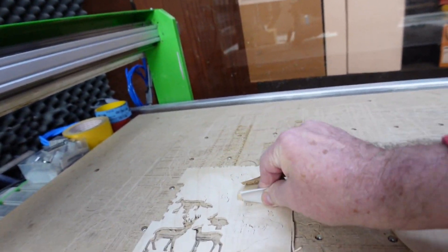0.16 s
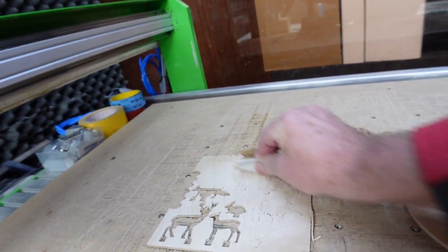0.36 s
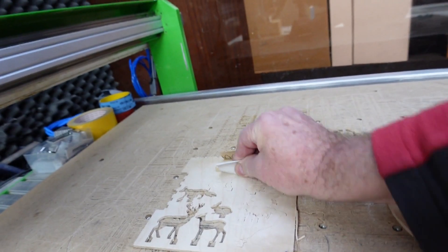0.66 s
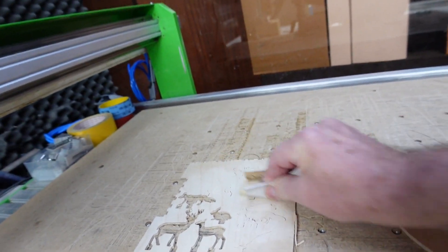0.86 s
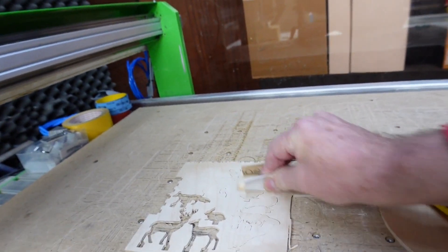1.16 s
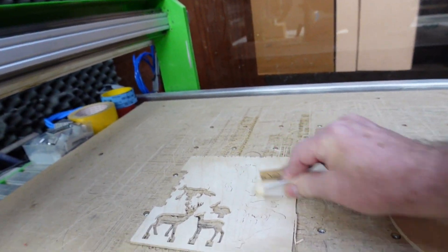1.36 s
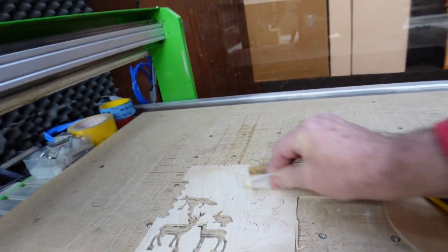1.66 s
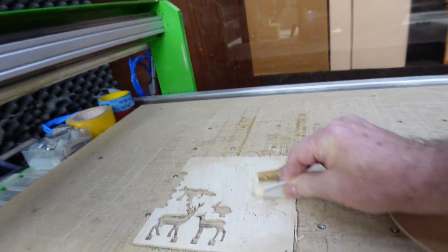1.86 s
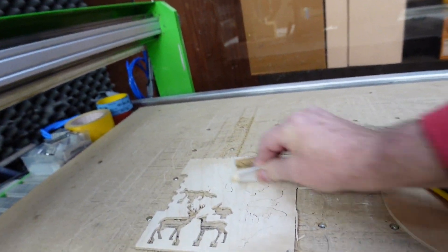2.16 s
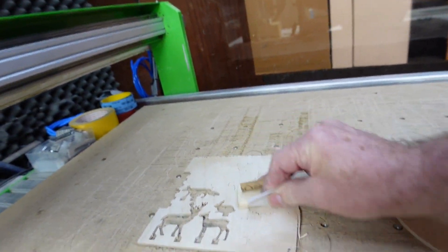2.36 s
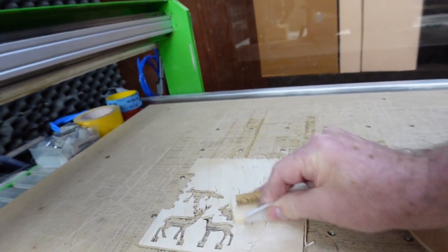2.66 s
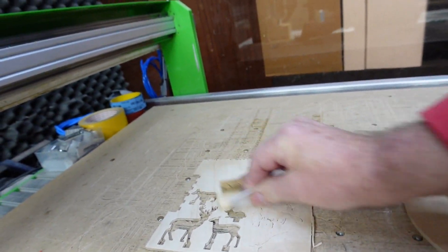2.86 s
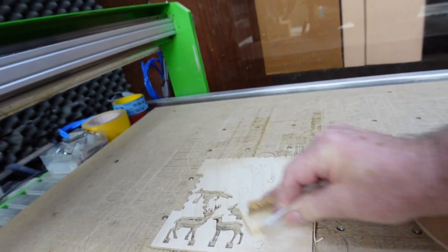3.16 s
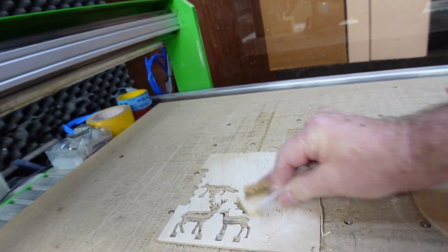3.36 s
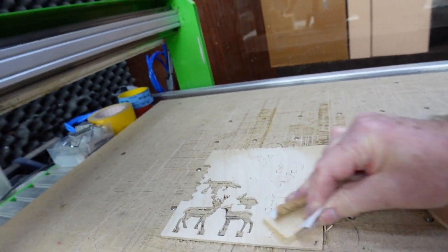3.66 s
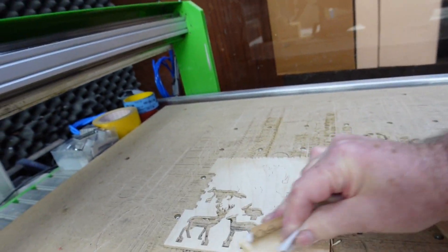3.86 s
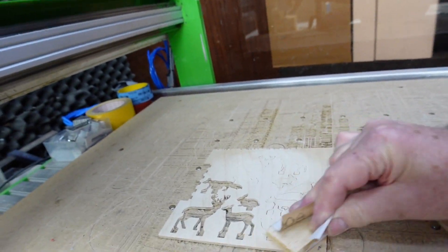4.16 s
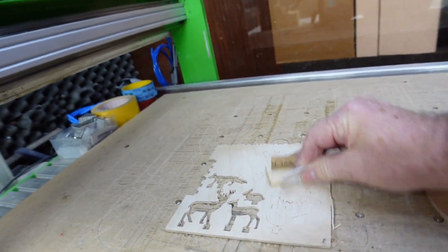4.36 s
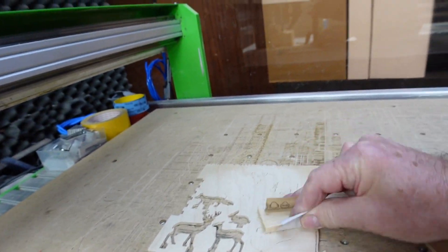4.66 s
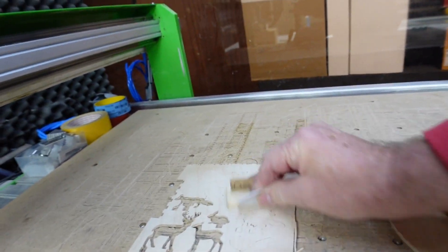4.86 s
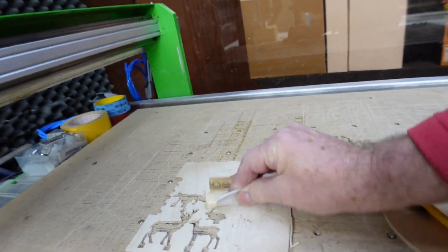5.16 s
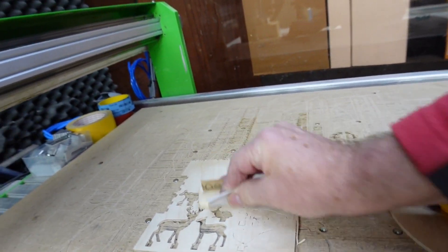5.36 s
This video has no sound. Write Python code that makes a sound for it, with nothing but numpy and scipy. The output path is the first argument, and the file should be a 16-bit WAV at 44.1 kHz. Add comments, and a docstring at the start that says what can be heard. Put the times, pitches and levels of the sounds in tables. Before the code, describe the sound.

In a workshop, heard from very near and almost dry, bristles scratch back and forth over wood in quick, uneven strokes, alternately stronger and weaker, each opening with a small catch. Low table bumps and papery hollow taps lie underneath. Hard clicks stand out around three to four seconds, where the scrubbing briefly fades before returning. Behind it are a steady soft fan hum and a very high, faint whine.

```python
"""Scrubbing brush on cut plywood

A small stiff brush is scrubbed to and fro over cut plywood on a machine table, heard from close by.
Bristle rasp is shaped noise and flicks that follow the speed of each stroke; catches and grazes are noise bursts.
Hard bright ticks, board knocks, table bumps and hollow taps are sums of dying modes.
Behind them lie a faint room tail, a fan drone of resonant noise, a steady-pitched whine and a brief whistle."""
import sys
import numpy as np
from scipy import signal
from scipy.io import wavfile
from scipy.ndimage import uniform_filter1d

SR = 44100
rng = np.random.default_rng(int(sys.argv[2]) if len(sys.argv) > 2 else 0)


def invert_db(level):
    """Linear amplitude ratio for a level in decibels (20 dB per decade), elementwise."""
    return 10 ** (np.asarray(level, dtype=float) / 20)


def digitize_waveform(pressure):
    """Quantize a signal to 16-bit integers and store it at the path in sys.argv[1].

    Rows of a 2-D input are taken as channels; values are limited to [-1, 1].
    """
    field = np.atleast_2d(pressure).T
    bounded = np.clip(field, -1, 1)
    quanta = np.round(bounded * 32767).astype(np.int16)
    wavfile.write(sys.argv[1], SR, quanta)


N = 243431


def evened(x):
    """Scales to rms 1."""
    return x / np.sqrt(np.mean(x ** 2) + 1e-20)


def wobble(count, smooth):
    """Slow random curve of rms 1: white noise averaged over smooth points."""
    return evened(uniform_filter1d(rng.standard_normal(count), smooth))


def read(points, hz):
    """Reads a table on a log-frequency axis, as a column."""
    f, value = np.transpose(points)
    return np.interp(np.log(hz + 1), np.log(f + 1), value)[:, None]


def add(mix, s, sound):
    """Mixes a sound in at time s."""
    part = mix[round(s * SR):][:len(sound)]
    part += sound[:len(part)]


def pair(z, other, hz):
    """Two microphone ports: partly alike spectra, with a balance and a phase lead."""
    # Each row: frequency in Hz, left-right likeness.
    likeness = [(60, 0.92), (180, .995), (550, 0.98), (1200, 0.99), (2200, 1), (6800, 1), (8200, .95),
                (11000, 0.82), (15000, 1)]
    # Each row: frequency in Hz, left minus right in dB.
    balance_db = [(60, -0.5), (1000, -0.5), (2500, -1.1), (6800, 0.5), (8500, -1.5), (15000, -3.5)]
    # Each row: frequency in Hz, lead of the left port in radians.
    lead_rad = [(60, 0.023), (6800, 0.026), (9000, -0.41), (11600, -0.096), (16000, 0.01)]
    same = np.clip(read(likeness, hz), -1, 1)
    turn = invert_db(read(balance_db, hz) / 2) * np.exp(.5j * read(lead_rad, hz))
    near, far = np.sqrt((1 + same) / 2), np.sqrt((1 - same) / 2)
    left = (near * z + far * other) * turn
    right = (near * z - far * other) / turn
    return np.array([left, right])


def ring(modes, rise_s, detune, pitch=1):
    """One blow: dying modes of alternate sign, each a little off from blow to blow, peak 1."""
    t = np.arange(SR // 4) / SR
    sign = (-1) ** np.arange(len(modes))
    factors = pitch * (1 + detune * rng.standard_normal(len(modes))) * sign
    x = np.zeros(len(t))
    for (hz, db, t60_s), factor in zip(modes, factors):
        x += invert_db(db - 60 * t / t60_s) * np.sin(2 * np.pi * hz * factor * t)
    x = x * (1 - np.exp(-t / rise_s))
    return x / abs(x).max()


def bristle_noise(flicks_per_s=3000, flick_db=2.5, flick_share=0.3):
    """Two raw noises: bristle tips slip (white noise) and flick over the grain (random clicks)."""
    flicks = (rng.random((2, N)) < flicks_per_s / SR) * invert_db(flick_db * np.minimum(rng.exponential(1, (2, N)), 4))
    flicks *= rng.choice([-1., 1.], (2, N))
    slips = rng.standard_normal((2, N))
    return evened(slips) + flick_share * evened(flicks)


def brush(patchy_db=1.97, flicker_db=0.29, width_wander_db=3.0):
    """Bristle tips rasp over the grain; hand speed sets level and brightness, catches add bursts."""
    # Strokes to and fro. Each row: catch of the bristles in seconds, crest level in dB before shading,
    # lateness of the crest, roundness of the speed arch, catch peak in dB before its tilt.
    strokes = [(-.005, -36, 1.2, 0.63, -43), (0.0494, -31, 0.97, 1.5, -20), (0.35, -32.5, 1.28, 0.6, -35),
               (0.478, -30.5, 1.4, 0.75, -27), (0.621, -27, 1.26, 0.96, -22),
               (0.7466, -30, 1.22, 0.64, -33), (0.8884, -28.5, 1.04, 0.75, -17),
               (1.0137, -29, 1.6, .52, -27), (1.1627, -27, 0.89, 1.12, -19), (1.278, -31, 1.37, .65, -25),
               (1.4, -29, 1.17, 1.15, -19), (1.5245, -31, 1.27, 0.49, -21), (1.653, -28, 1.08, 1.07, -14.5),
               (1.7884, -33.5, 1.46, 0.53, -20), (1.9126, -27.5, 1.25, 1.14, -24),
               (2.0453, -32.5, 1.03, 0.59, -21), (2.172, -27.5, 1.15, 1.07, -18),
               (2.303, -30.5, 1.2, 0.51, -22), (2.434, -26, 1.2, 1.05, -21), (2.569, -29, 1.4, 0.48, -27),
               (2.716, -27, 0.98, 1.07, -21), (2.8654, -30.5, 1.23, 0.56, -16.5),
               (3.007, -27, 1.13, 1.24, -16), (3.135, -29.5, 1.24, .46, -19), (3.287, -29, 1.1, 1.33, -29),
               (3.4056, -30.5, 1.22, 1, -28), (3.538, -29, 1, 0.97, -31), (3.655, -32.5, 0.99, 0.93, -32),
               (3.7787, -31.5, 0.97, 0.74, -31), (3.903, -33, 1.08, 0.8, -35),
               (4.0394, -35, 0.93, 1.4, -39), (4.153, -38, .91, 0.89, -38), (4.2737, -28, .92, 0.67, -23),
               (4.399, -31.5, 1.5, 0.67, -26), (4.52, -28.5, 0.81, 0.72, -26), (4.63, -32, 1.1, 0.76, -29),
               (4.746, -31, 1, 0.61, -21), (4.8717, -32.5, 0.8, 0.92, -38), (4.9881, -31, 1.07, 1.02, -23),
               (5.126, -33.5, 0.89, 0.72, -16), (5.243, -31.5, 1.12, 1.24, -18.5),
               (5.3596, -32.5, 0.9, 1.13, -38), (5.4733, -29.5, 1.05, 0.65, -27)]
    # Bristles brush the board while the hand pauses. Each row: start in seconds, peak in dB before its tilt.
    grazes = [(.221, -24), (.2804, -41)]
    # A catch is duller than the stroke. Each row: frequency in Hz, gain in dB.
    catch_tilt = [(1000, 12.5), (4000, 0.5), (12000, -22.5)]
    # Loose tips are brighter than a catch. Each row: frequency in Hz, gain in dB.
    graze_tilt = [(1000, 5), (4000, -1), (8000, 4), (15000, 0)]
    # Rasp colour. Each row: frequency in Hz, relative density in dB per Hz.
    rasp = [(350, -41), (620, -29.5), (830, -18), (1000, -17.5), (1380, -9), (1650, -15), (2050, -13.5),
            (3400, -3.5), (4750, -0.5), (5600, -4.5), (7400, -0.5), (9200, -3.5), (12000, -4.5),
            (15000, -9), (16500, -11)]
    # Each row: frequency in Hz, share of the stroke's spread.
    spread_share = [(500, 0.9), (1800, 1), (3500, 0.087), (6000, 0.21), (10000, 0.62), (16000, 0.93)]
    # Each row: frequency in Hz, power of speed in the level.
    speed_power = [(600, 0.37), (3000, 0.86), (9000, 0.99), (16000, 1.17)]
    # Lean of the brush. Each row: time in seconds,
    # dB moved from the middle of the rasp to its treble and, less, its low end.
    lean = [(0, -3.5), (.8, -3), (1.6, -3), (2.4, -1.8), (3.5, -2.5), (4.0, -6.5), (4.4, -1.7), (4.7, -1),
            (5.1, -3), (5.5, -2)]
    # Each row: frequency in Hz, share of the lean.
    lean_share = [(700, 0.3), (1300, 0.24), (2100, -0.5), (3500, -0.35), (10000, 0.98), (16000, 1.17)]
    # Rasp's low end as the brush moves over the board. Each row: time in seconds, gain in dB.
    low_rasp = [(0, 3), (.6, 2), (1.4, 1.5), (2.2, 0), (3.2, 0), (3.8, -2.5), (4.6, -2), (5.5, -1.5)]
    # Each row: frequency in Hz, share of the low-end gain.
    low_share = [(800, 1), (1700, 0)]
    # from the turn of the hand to the catch: a slow start flips late
    flip_s, flip_s_per_roundness = 0.0036, 0.013
    # a stroke lasts to the next turn, or the brush is lifted
    longest_s, overlap, last_stroke_s = 0.1575, 0.96, 0.19
    catch_fade_s, crest_db = 0.0084, -15
    hold_s, hold_db = 0.025, -5
    grip, creep_db = 0.11, -21
    # a light stroke has a wider rasp than one pressed hard
    spread_per_db, plain_db = -0.63, -28.5

    hz, t, z = signal.stft(bristle_noise(), SR, nperseg=256, noverlap=192)
    power, free = np.zeros(z.shape[1:]), np.ones(len(t))
    catch_s, _, _, round_, catch_db = np.transpose(strokes)
    turns = catch_s - flip_s - flip_s_per_roundness * round_
    lengths = np.minimum(overlap * np.diff(turns, append=turns[-1] + last_stroke_s), longest_s)

    bursts = [(s, db + read(catch_tilt, hz)) for s, db in zip(catch_s, catch_db)]
    bursts += [(s, db + read(graze_tilt, hz)) for s, db in grazes]
    for s, db in bursts:
        # the rasp is held down just ahead of a burst
        free[(t < s) & (t > s - hold_s)] = invert_db(hold_db)
        # rms of the burst lies a crest below its peak
        power += (t >= s) * invert_db(db + crest_db) ** 2 * np.exp(-2 * abs(t - s) / catch_fade_s)

    for s, length, (_, db, late, roundness, _) in zip(turns, lengths, strokes):
        spread_db = spread_per_db * (db - plain_db)
        u = np.clip((t - s) / length, 0, 1)
        arch = abs(np.sin(np.pi * u ** late)) ** roundness
        # below a least speed the tips grip and fall silent
        speed = np.maximum(arch - grip, 0) / (1 - grip) * np.where(u < .4, free, 1)
        # the bent bristles still creep around each turn of the hand
        creep = invert_db(creep_db) * np.exp(-((t - s - length / 2) / (0.54 * length)) ** 8)
        level = invert_db(db + spread_db * read(spread_share, hz))
        power += (level * (speed + creep) ** read(speed_power, hz)) ** 2

    grain = rng.standard_normal((len(t), len(hz))).T
    patches = evened(uniform_filter1d(uniform_filter1d(grain, 4, 0), 25, 1))
    flicker = wobble(len(t), 8)
    shade_db = np.interp(t, *np.transpose(lean)) * read(lean_share, hz)
    shade_db = shade_db + np.interp(t, *np.transpose(low_rasp)) * read(low_share, hz)
    # the rasp's stereo width wanders at random
    wander = invert_db(width_wander_db * wobble(len(t), 30))
    colour = evened(invert_db(read(rasp, hz)))
    field = np.sqrt(power) * colour * invert_db(shade_db + patchy_db * patches + flicker_db * flicker)
    ports = pair(z[0] * field, z[1] * field * wander, hz)
    return signal.istft(ports, SR, nperseg=256, noverlap=192)[1][:, :N]


def fan(swell_db=0.47, air_db=-67, other_share=0.44):
    """Air noise through the resonances of a casing, over a faint wide hiss."""
    # Casing resonances. Each row: frequency in Hz, width in Hz, level in dB rms.
    drone = [(381.1, 16, -55.5), (400.6, 17, -56.5), (487.2, 31.5, -62), (344, 17, -68), (278, 22, -74.5),
             (98, 9.2, -87), (87, 12, -84), (212, 41, -73)]
    # Hiss colour. Each row: frequency in Hz, relative density in dB per Hz.
    air = [(30, -26), (100, -17), (300, -14), (600, 0), (1000, -16), (1500, -21), (4000, -22), (7000, -21),
           (11000, -26), (16000, -18)]
    hz, t, z = signal.stft(rng.standard_normal((2, N)), SR, nperseg=8192)
    casing = np.zeros(len(hz))
    for centre_hz, width_hz, db in drone:
        peak = 1 / (1 + ((hz - centre_hz) / width_hz) ** 2) ** 1.19
        casing += (invert_db(db) * evened(peak)) ** 2
    hiss = invert_db(air_db) * evened(invert_db(read(air, hz)))
    field = np.sqrt(casing[:, None] + hiss ** 2)
    swell = invert_db(swell_db * wobble(len(t), 3))
    ports = pair(z[0] * field * swell, other_share * z[1] * field, hz)
    return signal.istft(ports, SR, nperseg=8192)[1][:, :N]


def tones():
    """A high sine whine, steady in pitch, and a whistle, wavering in pitch and level, that shows in the pause."""
    # Each row: time in seconds, whine level in dB rms.
    whine_db = [(0, -66), (.3, -69), (.6, -66), (2, -64), (3.5, -60), (4.2, -68), (5.6, -60)]
    whine_hz = 15321
    whistle_hz, whistle_db, octave_db = 6000, -64.5, -8
    from_s, to_s, fade_s = .14, .36, 0.018
    waver, flutter_db = 0.0029, 2  # rms: share of the pitch, dB
    t = np.arange(N) / SR
    whine = invert_db(np.interp(t, *np.transpose(whine_db))) * np.sin(2 * np.pi * whine_hz * t)
    phase = 2 * np.pi * np.cumsum(whistle_hz * (1 + waver * wobble(N, 400))) / SR
    edges = np.clip(np.minimum(t - from_s, to_s - t) / fade_s, 0, 1)
    level = edges * invert_db(whistle_db + flutter_db * wobble(N, 500))
    whistle = level * (np.sin(phase) + invert_db(octave_db) * np.sin(2 * phase))
    return np.sqrt(2) * (whine + whistle)  # from rms to peak


def room(x, t60_s=0.81, first_s=0.0038):
    """A short diffuse tail of dying noise, different at each port, duller than the source."""
    t = np.arange(SR // 3) / SR
    tail = rng.standard_normal((2, len(t))) * invert_db(-60 * t / t60_s) * (t > first_s)
    tail = signal.lfilter([1], [1, -.6], tail)
    return signal.fftconvolve(x[None], tail / np.linalg.norm(tail[0]), axes=1)[:, :N]


def blows(tick_side_db=-5, knock_side_db=-18, bump_side_db=-22, frame_side_db=-15.5):
    """Ticks, knocks and bumps set modes ringing; each port hears a slightly different ring."""
    # Hard bright ticks. Each row: start in seconds, peak in dB, pitch factor.
    ticks = [(0.3493, -25.5, 0.89), (2.8221, -15, 0.86), (3.1064, -12.5, 0.86), (3.3809, -15, 0.9),
             (3.6337, -11, 0.91), (3.6414, -36, 0.6), (3.9011, -17.5, 0.9), (4.156, -22, 0.88)]
    # Brush head on cut edges. Each row: start in seconds, peak in dB.
    knocks = [(0.914, -36.5), (1.11, -34), (1.611, -36), (2.362, -32.5), (2.379, -37), (3.134, -41),
              (3.208, -26), (4.753, -47), (5.126, -46), (5.302, -32)]
    # The hand pushes the table, the arm's weight shakes its frame.
    # Each row: start in seconds, table peak in dB, frame peak in dB.
    bumps = [(.009, -42.5, -54), (0.08, -44, -61), (0.349, -41.5, -72), (0.697, -49, -88), (1.16, -51, -67),
             (1.916, -52, -78), (2.353, -52, -69), (2.434, -43, -80), (2.745, -49, -75), (2.839, -48, -80),
             (3.034, -44, -70), (3.073, -44, -84), (3.211, -45, -80), (3.318, -44, -70), (3.364, -47, -80),
             (3.589, -46.5, -78), (3.639, -49.5, -80), (3.817, -47, -83), (3.903, -45, -78),
             (4.099, -49.5, -78), (4.141, -51, -73), (4.303, -46, -61), (4.335, -44, -80),
             (4.579, -49, -67), (4.751, -51, -72)]
    # Modes of tick, board, table and frame.
    # Each row: frequency in Hz before pitch and detuning, relative level in dB, t60 in seconds.
    tick_modes = [(1480, -15, 0.015), (1930, -4, 0.0046), (2980, -9, 0.016), (3640, 1.5, 0.011),
                  (4390, -0.5, 0.0076), (5200, 2, 0.007), (7500, -1, 0.0038), (8300, -8, 0.0048),
                  (10750, -6, .003)]
    board_modes = [(290, -14.5, 0.029), (456, -3, 0.013), (640, -3, 0.0097), (767, 0.5, 0.013),
                   (993, -8, 0.024), (1345, 0, 0.021), (2000, -9, .01)]
    table_modes = [(196, -8, 0.15), (224.3, -6, 0.21), (254, 1, 0.075), (296, -2.5, 0.1), (497.4, 1, 0.075)]
    frame_modes = [(82.5, 5, 0.47), (101, 19, 0.17), (136, -2, 0.11)]
    nudges_per_s, nudge_db, nudge_scatter_db = 25, -70, 5
    mid, side = np.zeros((2, N))
    for s, db, pitch in ticks:
        add(mid, s, invert_db(db) * ring(tick_modes, 0.00017, 0.037, pitch))
        add(side, s + 0.00018, invert_db(db + tick_side_db) * ring(tick_modes, 0.00011, 0.11, pitch))
    for s, db in knocks:
        add(mid, s, invert_db(db) * ring(board_modes, 0.0032, 0.069))
        add(side, s, invert_db(db + knock_side_db) * ring(board_modes, 0.00055, .08))
    for s, db, frame_db in bumps:
        add(mid, s, invert_db(db) * ring(table_modes, 0.0085, 0.061))
        add(mid, s, invert_db(frame_db) * ring(frame_modes, 0.014, 0.045))
        add(side, s, invert_db(frame_db + frame_side_db) * ring(frame_modes, 0.014, 0.06))
        add(side, s, invert_db(db + bump_side_db) * ring(table_modes, 0.0036, 0.055))
    # small pushes in between, at random times
    nudge_amps = invert_db(nudge_db + nudge_scatter_db * rng.standard_normal(N))
    nudges = (rng.random(N) < nudges_per_s / SR) * nudge_amps
    mid += signal.fftconvolve(nudges, ring(table_modes, 0.016, 0.043))[:N]
    side += invert_db(bump_side_db) * signal.fftconvolve(nudges, ring(table_modes, 0.0034, 0.13))[:N]
    return np.array([mid + side, mid - side])


def taps(mid_share=.3, echo_s=.011, echo_db=-7, lag_cycles=1.2):
    """Hollow taps that fall in pitch: each mode swells over its own cycles, so the low ones come late."""
    # About once in two strokes. Each row: start in seconds, peak in dB before echo and port balance.
    tap_times = [(.094, -43), (0.3508, -47), (0.5706, -42), (.7975, -50), (1.0304, -40.5), (1.2855, -46),
                 (1.61, -56), (1.824, -48), (2.0828, -43), (2.33, -48), (2.579, -43), (2.8225, -39.5),
                 (3.1065, -38.5), (3.3804, -41.5), (3.6337, -41), (3.9006, -44), (4.156, -49), (4.305, -54),
                 (4.541, -61)]
    # Each row: frequency in Hz before detuning, relative level in dB, t60 in seconds.
    hollow_modes = [(190, -15, .08), (300, -7, .05), (450, 0, .05), (650, -5, .025), (1000, -1, .014),
                    (1500, 1, .01)]
    t, out = np.arange(SR // 8) / SR, np.zeros(N)
    for s, db in tap_times:
        tap = np.zeros(len(t))
        for hz, mode_db, t60_s in hollow_modes:
            swell = 1 - np.exp(-(t * hz / lag_cycles) ** 2)
            tone = np.sin(2 * np.pi * hz * rng.uniform(.9, 1.1) * t)
            tap += invert_db(mode_db - 60 * t / t60_s) * swell * tone
        tap = invert_db(db) * tap / abs(tap).max()
        add(out, s, tap)
        add(out, s + echo_s, invert_db(echo_db) * tap)
    # wide: the ports move mostly against each other
    return np.array([(mid_share - 1) * out, (mid_share + 1) * out])


def scene():
    """Near work, its room tail and the workshop background."""
    work = brush() + blows() + taps()
    return work + invert_db(-30.5) * room(work.mean(0)) + fan() + tones()


def top_cut(x):
    """Nothing passes above the cut-off."""
    return signal.sosfilt(signal.butter(12, 16530, fs=SR, output="sos"), x)


def record(dry):
    """The microphone's bass cut (90 Hz) and band edge (15.85 kHz)."""
    bass_cut = signal.butter(2, 90, "high", fs=SR, output="sos")
    band_edge = signal.firwin(numtaps=511, cutoff=15850, window=("kaiser", 9), fs=SR)
    mix = signal.oaconvolve(signal.sosfilt(bass_cut, dry), band_edge[None], "same")
    return top_cut(mix)


dry = scene()
out = record(dry)
digitize_waveform(out)
```